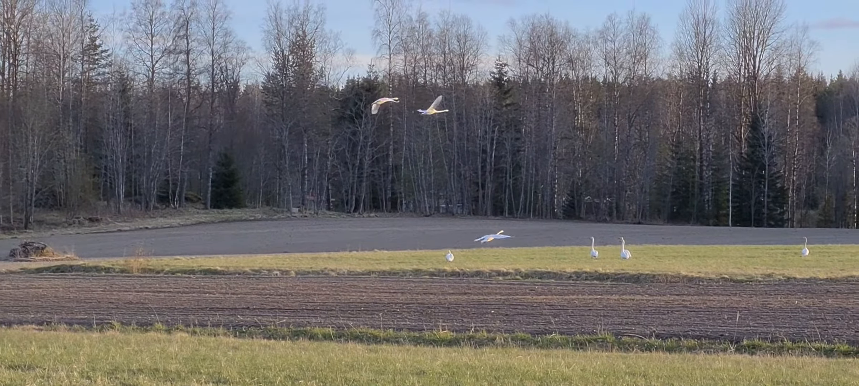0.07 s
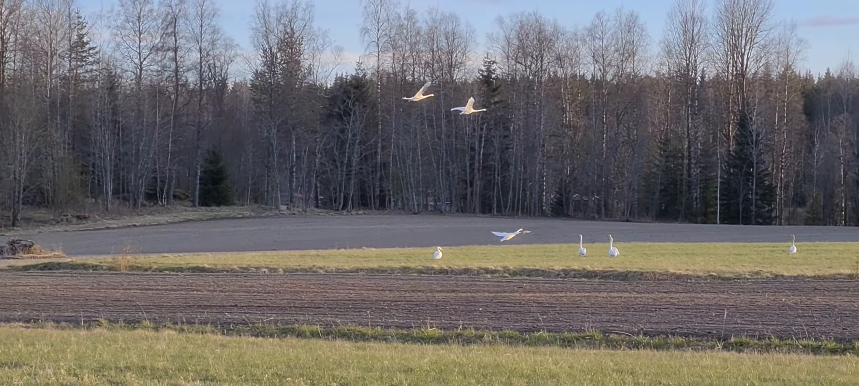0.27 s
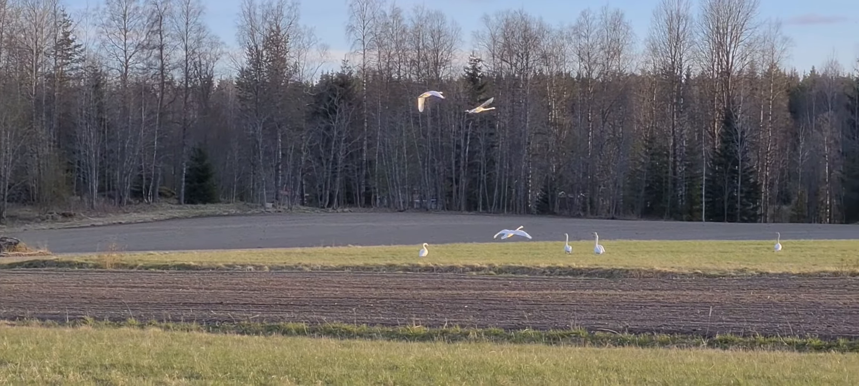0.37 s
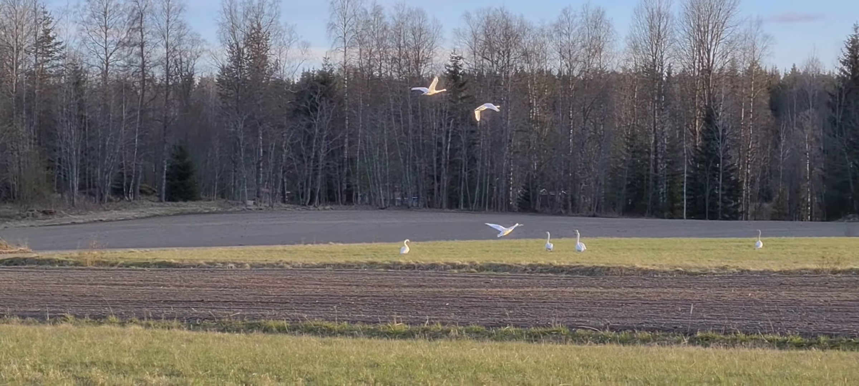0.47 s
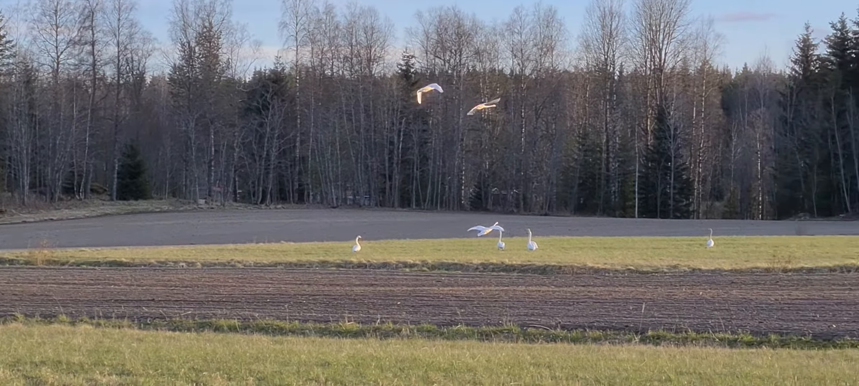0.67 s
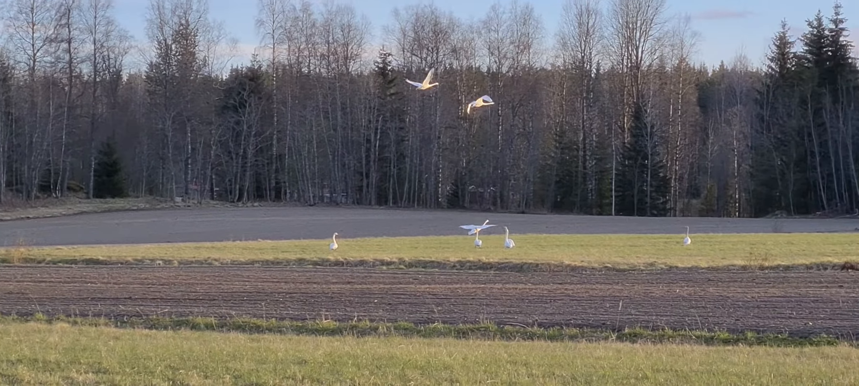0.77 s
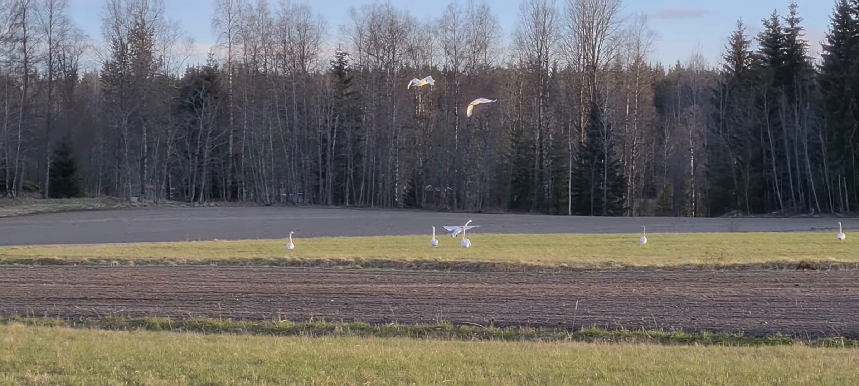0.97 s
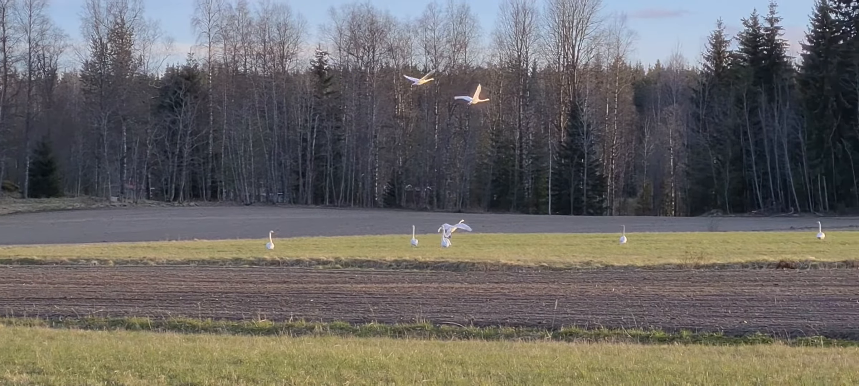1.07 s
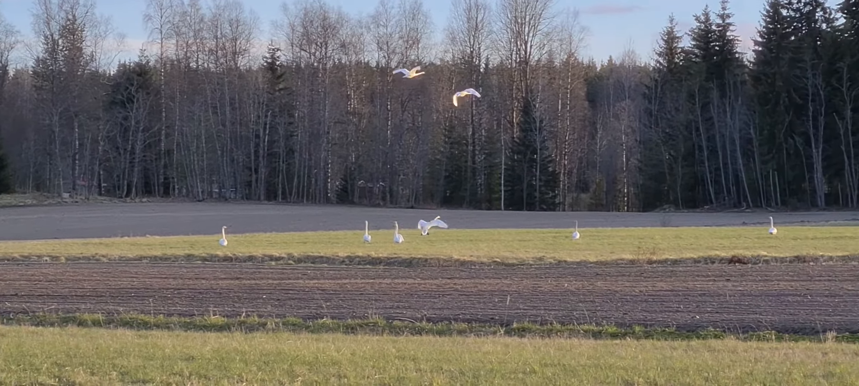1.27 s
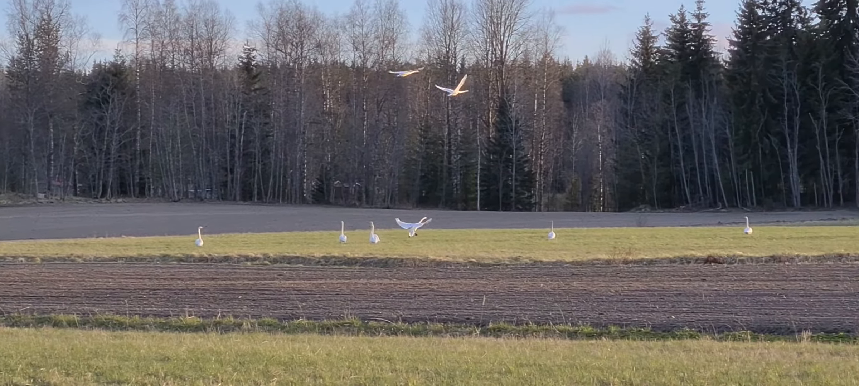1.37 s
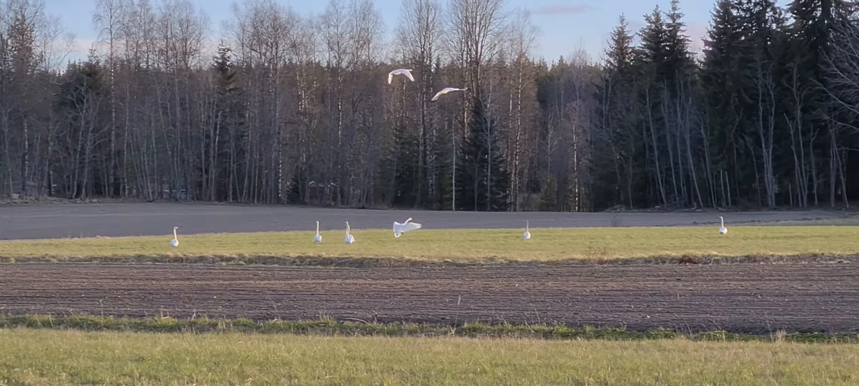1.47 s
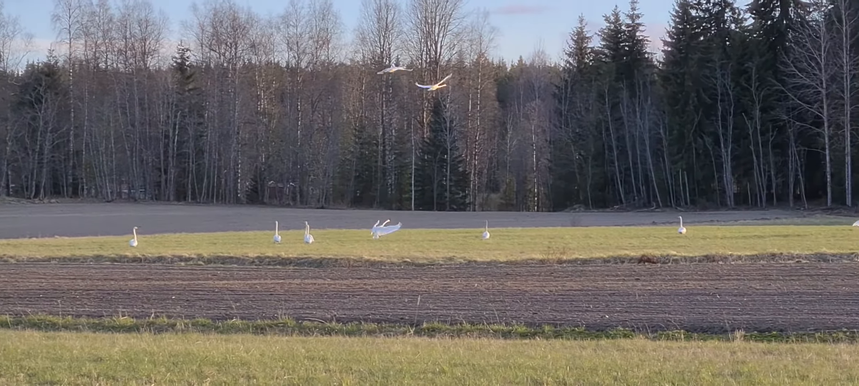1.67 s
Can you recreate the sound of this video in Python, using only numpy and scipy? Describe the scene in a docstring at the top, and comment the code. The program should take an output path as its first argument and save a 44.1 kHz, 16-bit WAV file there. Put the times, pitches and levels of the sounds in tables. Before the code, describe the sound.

A swan flock calls across farmland, brief hoots and slightly raspy honks thickening in the middle and stopping before a last faint honk; forest echo, quiet air, low wind rumble and handling thuds close to the microphone.

```python
"""Open fields: a flock of swans calls far off, and a forest edge throws the calls back.
Low honks and high whoops overlap; each is five partials on a curved pitch, some rough and raspy.
The echo is the calls convolved with dying noise; the quiet air is coloured noise.
Wind buffets the microphone as low noise with gusts; the hand holding it adds soft bumps and a tick."""
import sys
import numpy as np
from scipy import signal
from scipy.fft import rfft, irfft
from scipy.io import wavfile
from scipy.ndimage import uniform_filter1d

SR = 44100
rng = np.random.default_rng(int(sys.argv[2]) if len(sys.argv) > 2 else 0)


def store_pcm(level_fs):
    """Save levels as 16-bit WAV."""
    pcm = np.round(np.clip(level_fs, -1, 1) * 32767).astype(np.int16)
    wavfile.write(sys.argv[1], SR, np.atleast_2d(pcm).T)


N = 74970
TIME = np.arange(N) / SR
LEFT_RIGHT = np.array([[1], [-1]])

# Voice
JITTER, SHIMMER, JITTER_HZ = 0.032, 0.7, 135  # relative pitch and level spread at roughness 1; rate
RASP_DB, RASP_HZ = -10, 260  # modulation noise around each partial at roughness 1
ATTACK_SHARE, RELEASE_S = 0.27, 0.024  # share of the note's length; seconds
WHOOP_ABOVE_HZ, WHOOP_ATTACK_SHARE = 700, 0.2  # the voice breaks into its high notes more abruptly
ARCH_DB = 5  # louder in the middle than at the ends
BRIGHTEN = 0.1  # higher partials come in later and leave earlier
WAVER_DB, WAVER_HZ = 0.8, 25  # partial 1; grows with the root of the partial number

# Echo
ECHO_DB, ECHO_T60_S, ECHO_RISE_S = -13.5, 1.4, 0.017
ECHO_LIKENESS, ECHO_LEFT_LEAD_MS = 0.81, -0.028
ECHO_WOBBLE_MS, ECHO_WOBBLE_HZ = 0.16, 55

# Air, and a brief dip of the background
AIR_DB = -60
DIP_S, DIP_WIDTH_S, DIP_DB = 0.84, 0.094, -8.5

# Wind
BUFFET_LIKENESS, BUFFET_EVEN_S = 0.15, 0.049
EDDIES_DB, EDDIES_GROWTH = -29, 1.96  # at the strongest gust; dB per dB of gust

# Hand
BUMP_WIDTH_S = 0.0092
TICK_S, TICK_DB, TICK_DECAY_S = 0.327, -44.5, 0.00084

CUTOFF_HZ = 15750


def from_db(db):
    """Decibels to gain."""
    return 10 ** (np.asarray(db) / 20)


def rms_one(x):
    """Scale to unit power."""
    return x / np.sqrt(np.mean(x ** 2) + 1e-20)


def at_hz(points, hz):
    """Read a table on a log-frequency axis."""
    f, value = np.transpose(points)
    return np.interp(np.log(np.maximum(hz, 1)), np.log(f), value)


def drift(hz):
    """Random wavering up to about this rate; rms 1."""
    r = np.exp(-2 * np.pi * hz / SR)
    white = rng.standard_normal(N + SR // 10)
    slow = signal.lfilter([1], [1, -2 * r, r * r], white)
    return rms_one(slow[-N:])


def stereo_noise(spectrum, likeness):
    """Coloured noise whose two sides are partly alike; rms 1."""
    hz = np.fft.rfftfreq(N, 1 / SR)
    mid, side = rfft(rng.standard_normal((2, N))) * from_db(at_hz(spectrum, hz))
    alike = np.clip(at_hz(likeness, hz), -1, 1)
    both = np.sqrt(1 + alike) * mid + np.sqrt(1 - alike) * side * LEFT_RIGHT
    return rms_one(irfft(both, N))


def pan(db):
    """Gains for a left-minus-right level difference."""
    return from_db(LEFT_RIGHT * db / 2)


def note(start, length, hz_start, hz_mid, hz_end, db1, db2, db3, db4, db5, rough, lead_ms):
    """Honk or whoop: partials on a parabolic pitch, shaken by roughness, phase leading on one side."""
    on = (TIME >= start) & (TIME < start + length)
    t = TIME[on] - start
    curve = np.polyfit([0, 0.5, 1], [hz_start, hz_mid, hz_end], 2)
    pitch = np.polyval(curve, t / length)
    shaken = pitch * (1 + rough * JITTER * drift(JITTER_HZ)[on])
    phase = 2 * np.pi * np.cumsum(shaken) / SR
    phase = phase + LEFT_RIGHT * np.pi * pitch * lead_ms / 1000

    attack_s = length * (WHOOP_ATTACK_SHARE if hz_mid > WHOOP_ABOVE_HZ else ATTACK_SHARE)
    rise = np.sin(np.pi / 2 * np.minimum(t / attack_s, 1)) ** 2
    fall = np.sin(np.pi / 2 * np.clip((length - t) / RELEASE_S, 0, 1)) ** 2
    swell = rise * fall * from_db(ARCH_DB * (np.sin(np.pi * t / length) - 2 / np.pi))

    voice = 0
    for k, db in enumerate([db1, db2, db3, db4, db5], 1):
        rasp = rough * from_db(RASP_DB) * (drift(RASP_HZ)[on] + 1j * drift(RASP_HZ)[on])
        waver_db = WAVER_DB * np.sqrt(k) * drift(WAVER_HZ)[on]  # on the way across the field
        level = from_db(db + waver_db) * swell ** (1 + BRIGHTEN * (k - 1))
        tone = np.exp(1j * (k * phase + rng.uniform(0, 2 * np.pi)))
        voice = voice + level * np.real((1 + rasp) * tone)
    shimmer = 1 + rough * SHIMMER * drift(JITTER_HZ)[on]
    return np.sqrt(2) * voice * shimmer, on


def swans():
    """The flock: independently pitched voices add where their notes overlap."""
    # Notes: (start [s], length [s], pitch at start, middle, end [Hz],
    # nominal level of partials 1 to 5 [dB], roughness [0-1], lead of the left side [ms])
    notes = [ (-.02, 0.065, 924, 880, 810, -49, -93, -80.5, -82, -95.5, 0.31, -0.12),
             (0.041, .047, 870, 906, 875, -55.5, -95, -99, -102.5, -110, 0, -0.18),
             (0.157, .128, 516.6, 602, 528.4, -68, -49, -56, -79.5, -67, 0.19, -0.16),
             (.262, 0.048, 772, 793, 760, -57.5, -77.5, -87.5, -97, -96.5, 0.5, -.09),
             (0.418, 0.079, 618, 668.3, 643, -51, -46.5, -59.5, -70, -68.5, 0.13, -0.089),
             (.472, 0.035, 704, 752, 767, -67.5, -58, -88, -69, -79, 0.65, -0.069),
             (.473, 0.051, 880, 866.3, 792, -47.5, -58, -62.5, -64.5, -98, 0.24, -0.061),
             (.664, .064, 560, 595.6, 593, -61.5, -49.5, -68, -77.5, -74, 0.25, -0.098),
             (.696, 0.04, 718, 718, 720, -79, -50.5, -73.5, -72.5, -75.5, 0.26, -0.11),
             (0.702, 0.078, 854, 861, 883, -35.5, -54.5, -73.5, -71, -86, 0.07, -0.11),
             (0.752, 0.064, 905.5, 923, 833, -38, -61, -76, -57, -82.5, 0.07, -0.093),
             (.859, 0.11, 613.4, 627.3, 598, -55.5, -44.5, -57, -85, -75.5, 0.12, 0.032),
             (.903, 0.092, 887, 874, 852, -55.5, -62.5, -62, -70.5, -75.5, .6, 0.043),
             (.905, 0.092, 752, 738, 716, -86, -51, -73, -72.5, -81, 0.54, 0.0087),
             (.958, 0.043, 849, 827, 784, -52.5, -58, -52.5, -55, -84, 0.04, 0.013),
             (0.978, 0.058, 950, 983, 1050, -48, -66.5, -73.5, -77, -74, 0.37, -0.088),
             (1.01, 0.101, 637, 652.6, 661.4, -48.5, -52, -52, -74.5, -71, 0.17, -0.093),
             (1.073, 0.0975, 556.8, 613.4, 579, -46.5, -46.5, -66, -76.5, -65.5, 0.2, -0.11),
             (1.149, .056, 915, 907, 876, -39.5, -74, -61.5, -67, -72.5, 0.12, -0.14),
             (1.204, 0.13, 835, 865.4, 827, -50, -57.5, -65, -83, -74, 0.16, 0.043),
             (1.28, .074, 550, 588.3, 556, -56, -47, -59, -74, -68, 0.42, 0.065),
             (1.298, 0.096, 644, 672.6, 653, -49.5, -44.5, -52, -70.5, -82, 0.4, 0.03),
             (1.322, .086, 810, 801, 729, -47, -55, -62, -66, -79, 0.18, -0.051),
             (1.34, 0.12, 943, 964.7, 902, -42, -59.5, -66, -64, -99, 0.02, -0.042),
             (1.659, 0.069, 626, 657.4, 656, -61.5, -55, -70.5, -69.5, -62.5, 0.11, -0.13)]
    out = np.zeros((2, N))
    for row in notes:
        sound, on = note(*row)
        out[:, on] += sound
    return out


def forest(calls):
    """Countless trunks scatter a dying echo: calls convolved with decaying noise, then coloured."""
    # Echo colour: (frequency [Hz], gain [dB])
    echo_colour = [(400, 1), (650, -8), (900, -11), (1300, -7), (1800, 3), (2500, -11), (3100, 15.5),
                   (3700, -7), (6000, 5.5)]
    tail = stereo_noise([(1000, 0)], [(1000, ECHO_LIKENESS)])
    tail = tail * from_db(-60 * TIME / ECHO_T60_S) * np.minimum(TIME / ECHO_RISE_S, 1)
    tail = tail / np.sqrt(np.sum(tail ** 2) / 2)
    hz = np.fft.rfftfreq(2 * N, 1 / SR)
    lead = np.exp(1j * np.pi * hz * LEFT_RIGHT * ECHO_LEFT_LEAD_MS / 1000)
    gain = from_db(ECHO_DB + at_hz(echo_colour, hz))
    # the left channel of the calls feeds both sides
    return irfft(rfft(calls[0], 2 * N) * rfft(tail, 2 * N) * lead * gain)[:, :N]


def air():
    """Quiet air of the fields: steady coloured noise."""
    # Air spectrum: (frequency [Hz], relative density [dB per Hz])
    air_colour = [(30, 10), (150, 4), (300, -3.5), (480, 1.5), (570, -6.5), (650, 3.5), (740, -10.5),
                  (900, 6), (1050, -10.5), (1800, -9.5), (2500, -19), (4000, -20), (5500, -24.5),
                  (7200, -20.5), (8200, -25.5), (9500, -30), (11500, -21.5), (15500, -23.5)]
    # Left-right likeness of the air: (frequency [Hz], correlation [-1 to 1])
    air_likeness = [(100, 0.1), (800, 0.4), (2500, 0), (5000, 0.23), (15000, 0.17)]
    return from_db(AIR_DB) * stereo_noise(air_colour, air_likeness)


def background(calls):
    """Echo and air, both dipping briefly; a wavering delay smears the echo's high partials most."""
    when = TIME + ECHO_WOBBLE_MS / 1000 * drift(ECHO_WOBBLE_HZ)
    echo = np.array([np.interp(when, TIME, side) for side in forest(calls)])
    dip = from_db(DIP_DB * np.exp(-((TIME - DIP_S) / DIP_WIDTH_S) ** 2))
    return echo * dip + air() * np.sqrt(dip)  # the air dips by half the dB


def wind():
    """Low buffeting on the microphone ports; strong gusts add smaller, brighter eddies."""
    # Gusts: (time [s], buffeting level [dB], left minus right [dB])
    gusts = [(0, -36.5, 3.5), (0.121, -34.5, 2.5), (0.199, -28.5, 1.5), (0.286, -28, 4.5), (0.328, -28, 9),
             (.41, -51.5, 4.5), (0.519, -43.5, -1.5), (0.578, -33, 10.5), (0.699, -32, 3),
             (0.779, -33.5, 3), (.87, -38, 8.5), (.95, -44, 11), (1.032, -59, 15.5), (1.099, -40, 7.5),
             (1.169, -40.5, 11), (1.249, -36.5, 8), (1.349, -48, 14), (1.439, -36, 2.5),
             (1.499, -47.5, 7.5), (1.622, -51.5, 8.5), (1.68, -40.5, 7.5), (1.7, -44, 4)]
    # Buffeting spectrum: (frequency [Hz], relative density [dB per Hz])
    buffet_colour = [(20, -15), (40, -6.5), (63, 0), (85, -4), (120, -8), (170, -14), (250, -45.5),
                     (400, -50.5), (800, -70.5), (2000, -93)]
    # Eddy spectrum: (frequency [Hz], relative density [dB per Hz])
    eddy_colour = [(80, 6), (165, 8), (280, -11.5), (450, -24), (900, -35.5), (3000, -58), (10000, -89.5)]
    s, db, side_db = np.transpose(gusts)
    gust_db = np.interp(TIME, s, db)
    likeness = [(100, BUFFET_LIKENESS)]
    lumps = stereo_noise(buffet_colour, likeness)
    eddies = stereo_noise(eddy_colour, likeness)
    # even out the lumps so that the gust table sets their level
    power = uniform_filter1d(np.mean(lumps ** 2, axis=0), int(BUFFET_EVEN_S * SR))
    lumps = lumps / np.sqrt(power + 1e-9)
    eddies_db = EDDIES_DB + EDDIES_GROWTH * (gust_db - db.max())
    both = lumps * from_db(gust_db) + eddies * from_db(eddies_db)
    return both * pan(np.interp(TIME, s, side_db))


def handling():
    """Hand on the casing: short low cosines under Gaussian swells, and one decaying noise tick."""
    # Bumps: (centre [s], nominal peak [dB], pitch [Hz], left minus right [dB])
    bump_rows = [(0.199, -23.5, 110, 9.5), (0.263, -14.5, 64.7, -3.5), (0.286, -14.5, 80, 5),
                 (0.619, -20, 64, -0.5), (0.661, -26.5, 37.7, -1.5), (0.776, -23, 62, -10),
                 (.852, -23, 66.4, 7), (1.201, -31, 97, 9.5), (1.336, -31, 49.4, 12.5),
                 (1.424, -29, 71.8, -16.5)]
    # Tick spectrum: (frequency [Hz], relative density [dB per Hz])
    tick_colour = [(500, 26.5), (3000, 19), (5000, -1.5), (8300, 3.5), (9800, -21.5), (15000, -35)]
    bumps = 0
    for s, db, hz, side_db in bump_rows:
        t = TIME - s
        swell = np.exp(-(t / BUMP_WIDTH_S) ** 2)
        thud = np.cos(2 * np.pi * hz * t + rng.uniform(0, 2 * np.pi))
        bumps = bumps + from_db(db) * pan(side_db) * swell * thud
    decay = (TIME >= TICK_S) * np.exp(-np.abs(TIME - TICK_S) / TICK_DECAY_S)
    tick = stereo_noise(tick_colour, [(1000, 1.0)]) * decay
    return bumps + from_db(TICK_DB) * tick


def scene():
    """The flock and its echo over quiet air, with wind and handling close by."""
    calls = swans()
    return calls + background(calls) + wind() + handling()


def record(dry):
    """The top is cut steeply by an elliptic low-pass."""
    low_pass = signal.ellip(12, 0.1, 80, CUTOFF_HZ, fs=SR, output="sos")
    return signal.sosfilt(low_pass, dry)


dry = scene()
out = record(dry)
store_pcm(out)
```